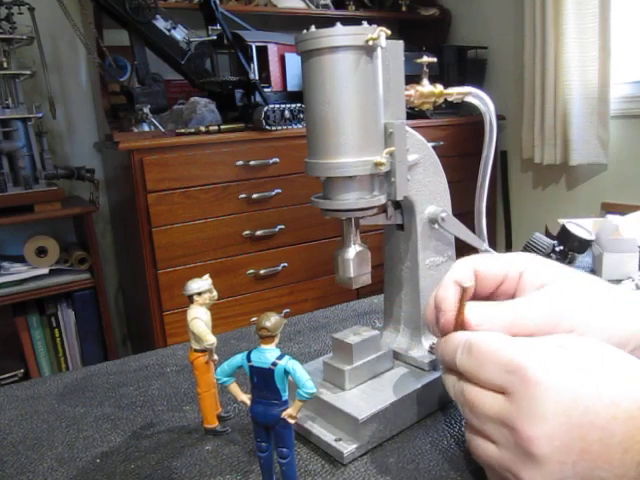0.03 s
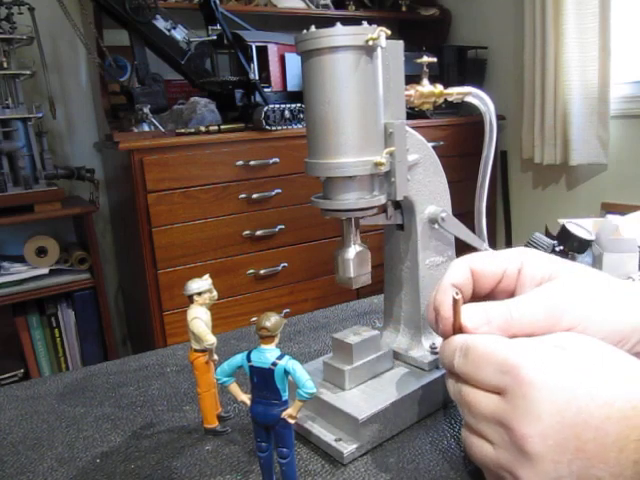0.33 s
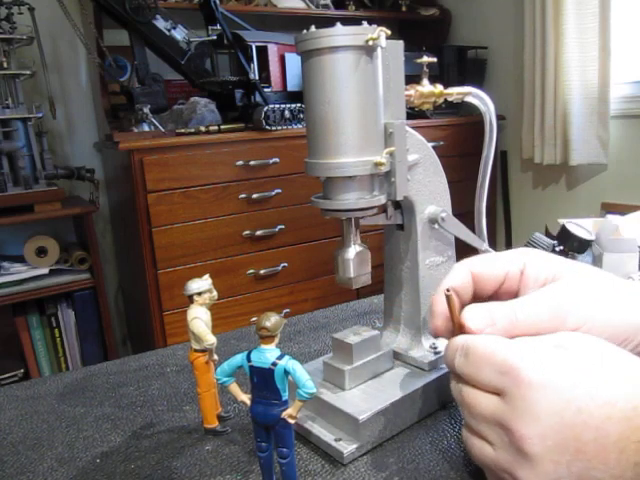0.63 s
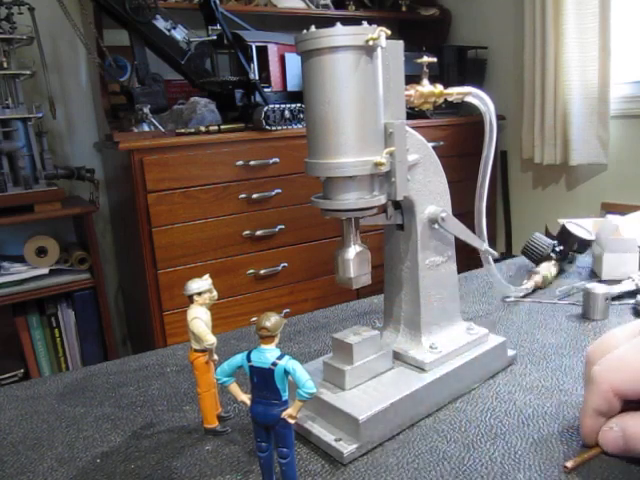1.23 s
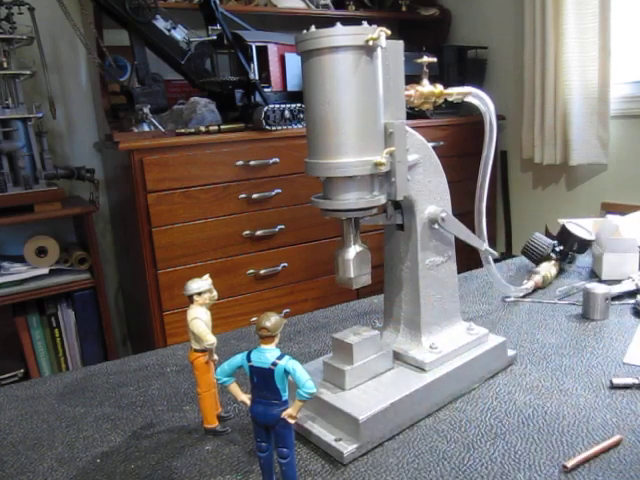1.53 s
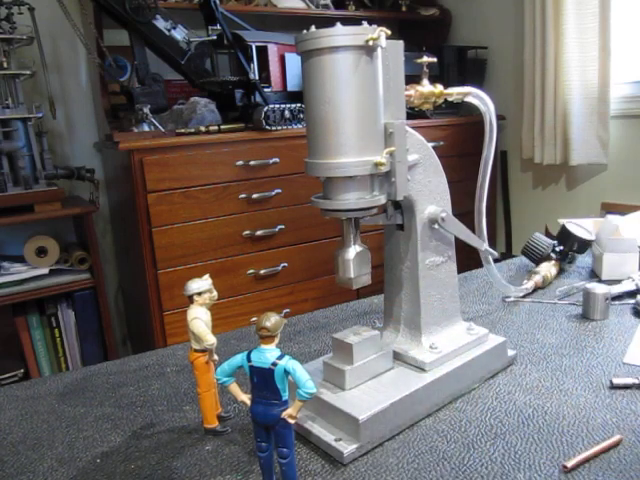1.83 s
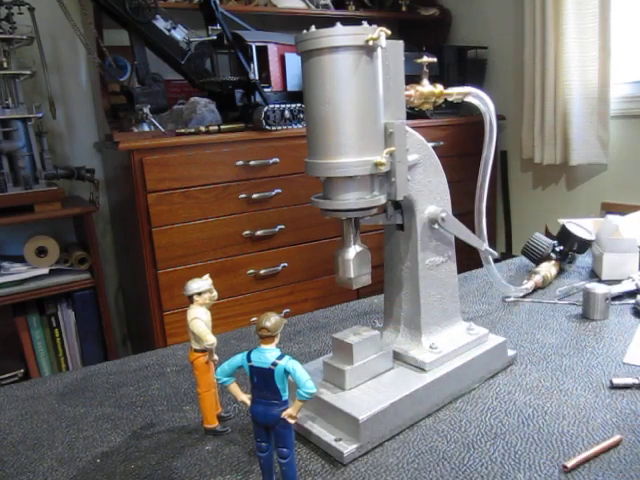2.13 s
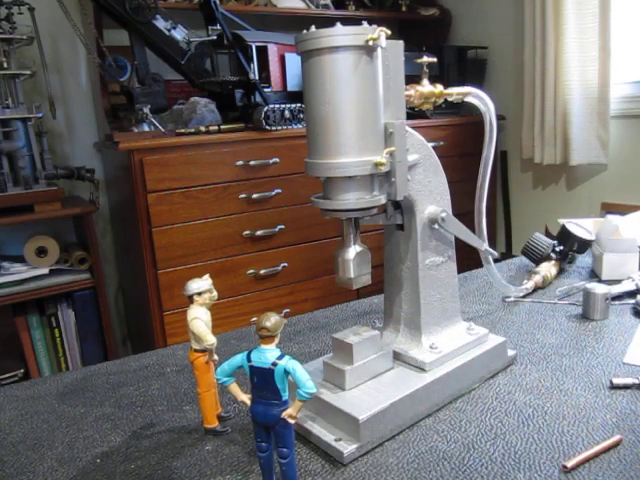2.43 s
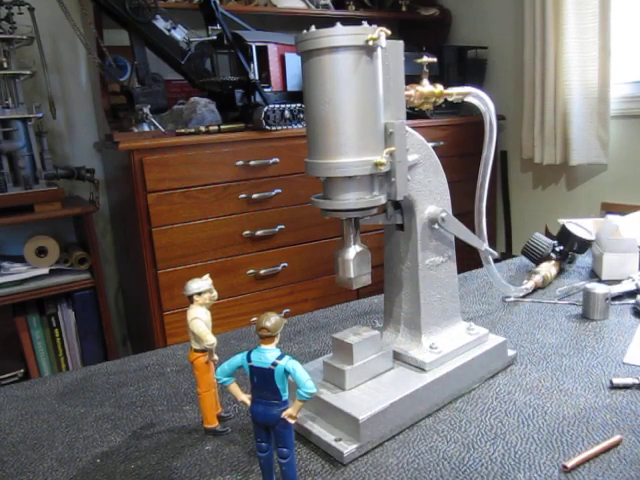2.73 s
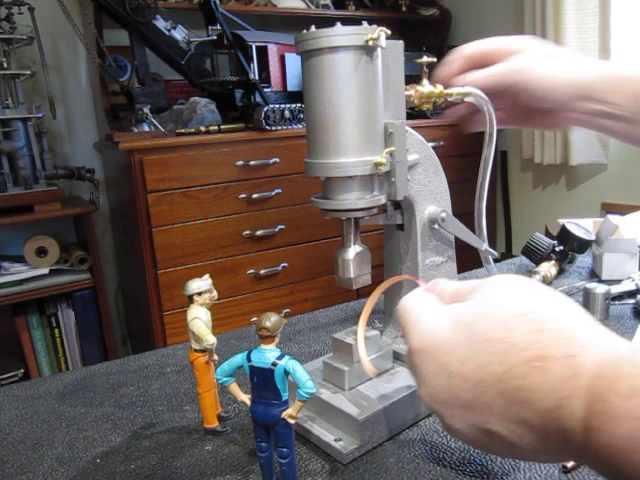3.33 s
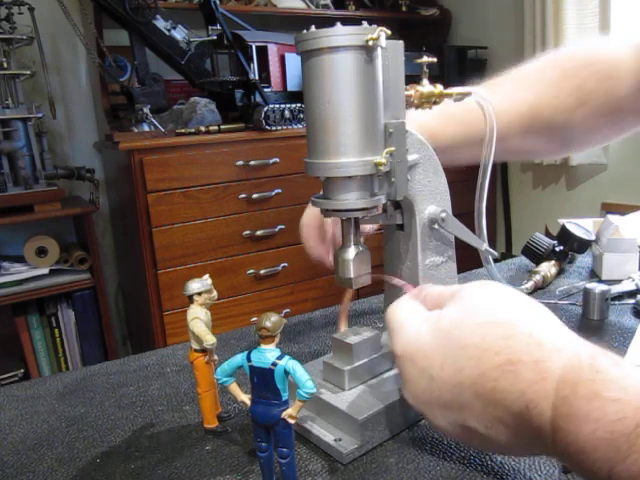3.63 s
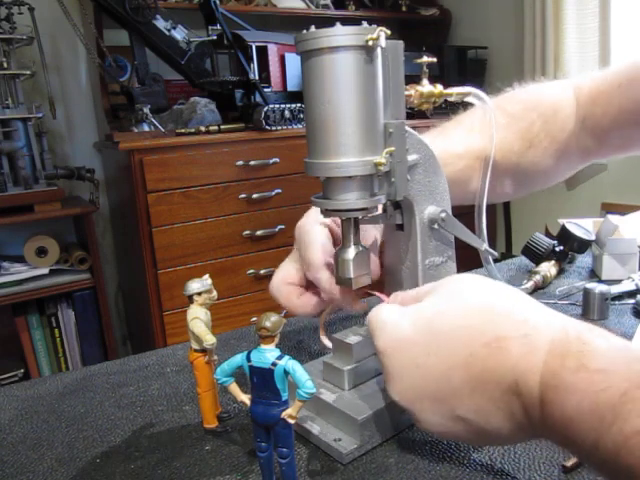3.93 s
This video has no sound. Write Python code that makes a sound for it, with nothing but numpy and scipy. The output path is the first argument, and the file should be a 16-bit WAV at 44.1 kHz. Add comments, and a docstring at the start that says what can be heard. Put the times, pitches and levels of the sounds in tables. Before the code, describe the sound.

Air hisses from a model machine's valve, slowly swelling, as a metal rod clicks down.

```python
"""Air leak on a workbench

Compressed air leaks steadily from the valve of a model steam hammer, and its turbulent jet hisses.
A small metal rod is set down and bounces, each impact clicking and exciting the modes of the bench.
The bench is bumped softly, and an arm rustles as it reaches round the machine.
The whole sound, room included, swells slowly; source levels are given before this swell."""
import sys
import numpy as np
from scipy import signal
from scipy.fft import rfft, irfft
from scipy.io import wavfile
from scipy.ndimage import uniform_filter1d

SR = 44100
rng = np.random.default_rng(int(sys.argv[2]) if len(sys.argv) > 2 else 0)


def generate_wav(sig):
    """Save sig (samples, or channels by samples) to the path in sys.argv[1] as 16-bit PCM at SR."""
    pcm = np.round(np.clip(np.atleast_2d(sig).T, -1, 1) * 32767).astype(np.int16)
    wavfile.write(sys.argv[1], SR, pcm)


N = 176400


def amp(db):
    """Amplitude ratio of a level in decibels."""
    return 10 ** (np.asarray(db) / 20)


def unit_rms(x):
    """Normalisation to an rms of one."""
    return x / np.sqrt(np.mean(x ** 2) + 1e-20)


def at_frequency(points, hz):
    """Interpolation on a log-frequency axis."""
    point_hz, value = np.transpose(points)
    return np.interp(np.log(hz + 1), np.log(point_hz + 1), value)


def envelope(points):
    """Gain at every sample, interpolated in decibels."""
    return amp(np.interp(np.arange(N) / SR, *np.transpose(points)))


def add(mix, start_s, sound):
    """Superposition of a sound on the mix."""
    part = mix[round(start_s * SR):][:len(sound)]
    part += sound[:len(part)]


def coloured_noise(spectrum):
    """Spectral shaping of white noise, at unit rms."""
    gain = amp(at_frequency(spectrum, np.fft.rfftfreq(N, 1 / SR)))
    return unit_rms(irfft(rfft(rng.standard_normal(N)) * gain, N))


def smooth_field(shape, bins, frames):
    """A moving average correlates random values over frequency and time."""
    field = rng.standard_normal(shape)
    for axis, span in enumerate((bins, frames)):
        field = uniform_filter1d(field, span, axis)
    return unit_rms(field)


# Background spectrum: frequency_hz, relative_density_db
ROOM_TONE_SPECTRUM = [(20, 0.5), (60, 0), (150, 0.5), (340, -4), (550, -7.5), (1000, -13.5), (2000, -22.5)]

def room_tone(level_db=-63.5):
    """Stationary noise, strongest in the bass, fills the workshop."""
    return amp(level_db) * coloured_noise(ROOM_TONE_SPECTRUM)


# Reverberation time of the workshop: frequency_hz, t60_s
ROOM_DECAY = [(150, .2), (800, .23), (2500, .22), (8000, .15)]

def reverberation(x, delay_s=0.0045):
    """Dense reflections decay exponentially, the treble dying first."""
    hz, t, spectra = signal.stft(rng.standard_normal(SR // 2), SR, nperseg=256)
    decay = amp(-60 * t / at_frequency(ROOM_DECAY, hz)[:, None])
    tail = signal.istft(spectra * decay, SR, nperseg=256)[1]
    tail *= np.arange(len(tail)) > delay_s * SR
    return signal.fftconvolve(x, tail / np.linalg.norm(tail))[:N]


# Loudness of the moving arm: time_s, level_db
ARM_LEVEL = [(3.04, -76), (3.1, -56), (3.13, -49), (3.21, -55.5), (3.41, -60.5), (3.48, -52), (3.7, -53.5),
             (4.0, -54.5)]
# Spectrum of its rustle: frequency_hz, relative_density_db
ARM_SPECTRUM = [(25, -4), (120, -3.5), (280, 1), (430, -4), (800, 1), (1200, -2.5), (2500, -13)]

def arm_rustle():
    """Amplitude modulation: the rustle rises and falls as the arm moves."""
    return envelope(ARM_LEVEL) * coloured_noise(ARM_SPECTRUM)


# Spectrum of a metal contact: frequency_hz, relative_level_db
CLICK_SPECTRUM = [(40, -55), (150, -38), (500, -0.5), (1200, -2), (2000, -4.5), (2700, -1), (4100, 1),
                  (5200, -10), (7000, -1), (10000, -31), (16000, -41)]

def metal_click(size=2048):
    """An impact as a minimum-phase pulse: its energy comes early, with a peak of one."""
    hz = abs(np.fft.fftfreq(size, 1 / SR))
    log_gain = np.log(amp(at_frequency(CLICK_SPECTRUM, hz)))
    spectrum = np.exp(np.conj(signal.hilbert(log_gain)))
    pulse = np.fft.ifft(spectrum).real
    return pulse / abs(pulse).max()


# Modes of the bench top with the rod on it: pitch_hz, gain_db, t60_s
BENCH_MODES = [(185, -20, 0.14), (247, -13, 0.071), (369, -3.5, 0.12), (463, -7, .05), (519, -3.5, .07),
               (603, -3.5, 0.055), (678, -11, .08), (790, -6.5, 0.19), (1006, -14, 0.36), (1490, -5, 0.064),
               (1826, -6, .07), (2000, 4.5, 0.029), (2430, -5, 0.044), (3600, 1, 0.0081)]

def bench_resonance(force):
    """Modal response: the force is convolved with a sum of damped sinusoids."""
    t = np.arange(SR // 2) / SR
    impulse_response = sum(amp(db) * np.exp(-np.log(1000) * t / t60) * np.cos(2 * np.pi * hz * t)
                           for hz, db, t60 in BENCH_MODES)
    return signal.fftconvolve(force, impulse_response)[:N]


# Bounces of the rod: start_s, click_db, impulse_db
ROD_BOUNCES = [(1.1850, -43, -48), (1.1906, -12.5, -36.5), (1.1920, -33, -43.5), (1.1988, -31, -44),
               (1.2070, -13.5, -36.5)]
# Soft bumps on the bench: start_s, impulse_db, contact_s
SOFT_BUMPS = [(1.970, -41, 0.0038), (1.984, -36.5, 0.0028), (2.003, -42, 0.0046), (3.113, -43, 0.0036)]

def bench_impacts(click_reverb_db=-6, ring_reverb_db=-7.5):
    """Contact time limits bandwidth: hard knocks excite every mode, soft bumps mainly the low ones."""
    clicks, force, click = np.zeros(N), np.zeros(N), metal_click()
    for start_s, click_db, impulse_db in ROD_BOUNCES:
        add(clicks, start_s, amp(click_db) * click)
        add(force, start_s, amp([impulse_db]))
    for start_s, impulse_db, contact_s in SOFT_BUMPS:
        scaled_time = np.arange(SR // 50) / SR / contact_s * 2 * np.pi
        push = scaled_time * np.exp(-scaled_time)
        add(force, start_s, amp(impulse_db) * push / push.sum())
    ring = bench_resonance(force)
    return clicks + ring + reverberation(amp(click_reverb_db) * clicks + amp(ring_reverb_db) * ring)


# Faint whistles in the hiss: start_s, end_s, pitch_hz, half_width_hz, level_db
WHISTLE_BANDS = [(3.81, 4.0, 2320, 75, -54.5), (3.66, 4.05, 1450, 110, -56), (3.24, 3.46, 860, 65, -63),
                 (3.76, 4.0, 8650, 550, -42.5)]

def whistles(fade_s=0.026):
    """Narrow-band noise is heard as pitch: parts of the hiss stand out for a moment."""
    t, hz, out = np.arange(N) / SR, np.fft.rfftfreq(N, 1 / SR), np.zeros(N)
    for start_s, end_s, pitch_hz, half_width_hz, level_db in WHISTLE_BANDS:
        detuning = (hz - pitch_hz) / half_width_hz
        band = unit_rms(irfft(rfft(rng.standard_normal(N)) / (1 + detuning ** 2), N))
        gate = np.clip(np.minimum(t - start_s, end_s - t) / fade_s, 0, 1)
        out += amp(level_db) * band * gate
    return out


# Spectrum of the air jet: frequency_hz, relative_density_db
JET_SPECTRUM = [(200, -24.5), (700, -21), (1180, -17.5), (1420, -8.5), (1850, -6.5), (2480, -11),
                (2900, -2.5), (3300, -2.5), (4200, -4.5), (5700, -1), (7300, 0.5), (8800, 2), (9700, -1),
                (11900, -10.5), (13600, -15.5), (15700, -22.5)]

def valve_leak(level_db=-35.5, reverb_db=-13.5):
    """A turbulent jet radiates broadband noise whose level and colour fluctuate slightly."""
    spectra = signal.stft(coloured_noise(JET_SPECTRUM), nperseg=512)[2]
    flutter_db = 0.17 * smooth_field((1, spectra.shape[1]), bins=1, frames=12)
    flicker_db = 0.83 * smooth_field(spectra.shape, bins=7, frames=8)
    drift_db = 0.19 * smooth_field(spectra.shape, bins=3, frames=90)
    spectra *= amp(flicker_db + drift_db + flutter_db)
    jet = unit_rms(signal.istft(spectra, nperseg=512)[1][:N])
    return amp(level_db) * unit_rms(jet + amp(reverb_db) * reverberation(jet))


def scene():
    """The sources add linearly; identical channels place them in the middle."""
    mix = valve_leak() + whistles() + bench_impacts() + room_tone() + arm_rustle()
    return np.array([mix, mix])


# Swell of the whole sound: time_s, gain_db
SWELL_GAIN = [(0, -15), (.7, -12.5), (1.0, -11), (1.6, -8.9), (2.2, -6), (2.65, -5), (3.3, -2.5),
              (3.7, -0.74), (3.92, 0.3), (4.0, -0.5)]

def record(dry):
    """A slowly varying gain swells the sound, and a low-pass filter limits its bandwidth."""
    cutoff_hz = 15800
    low_pass = signal.firwin(701, cutoff_hz, window=("kaiser", 9), fs=SR)
    return signal.oaconvolve(dry * envelope(SWELL_GAIN), low_pass[None], "same")


dry = scene()
out = record(dry)
generate_wav(out)
```